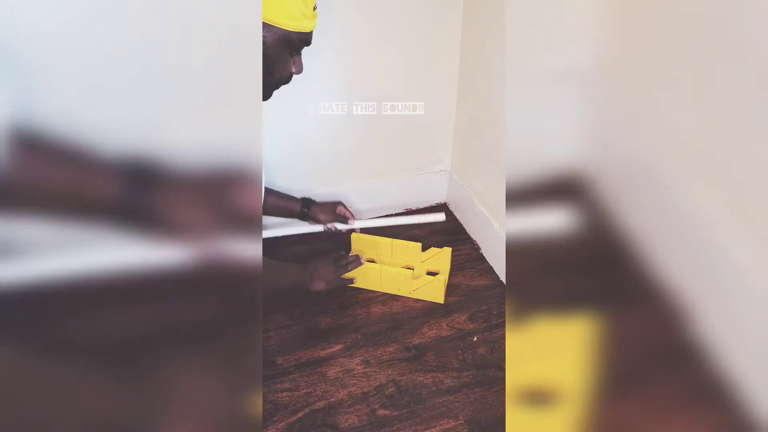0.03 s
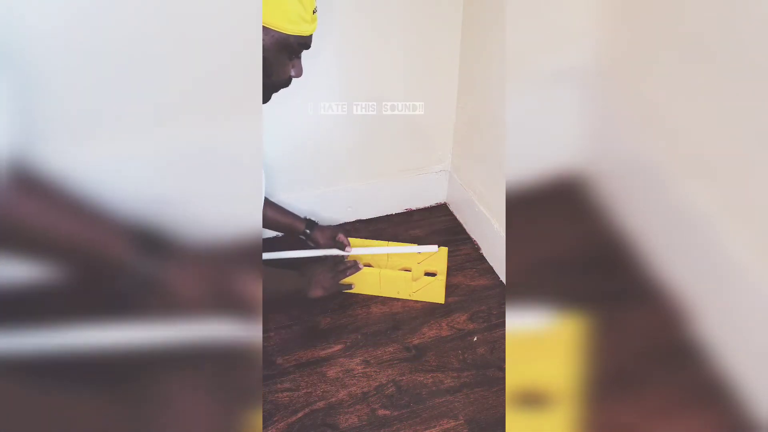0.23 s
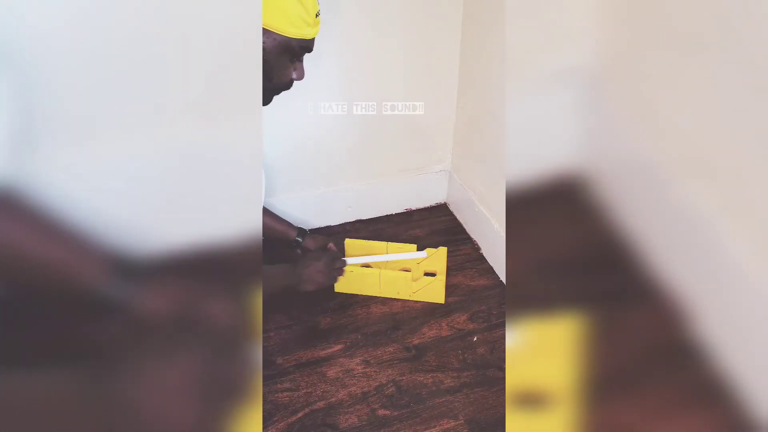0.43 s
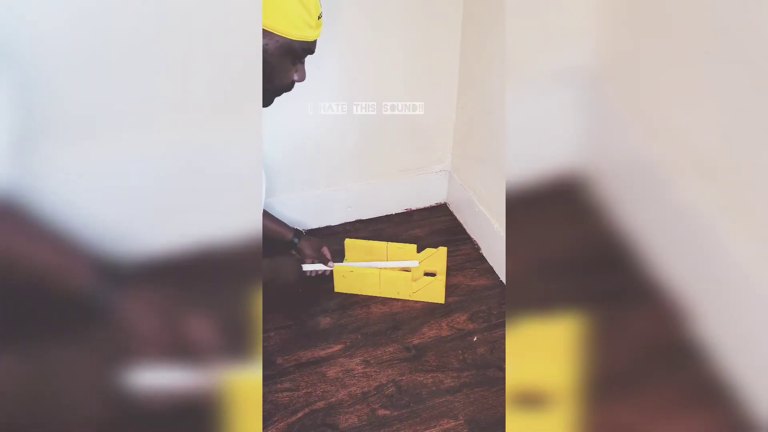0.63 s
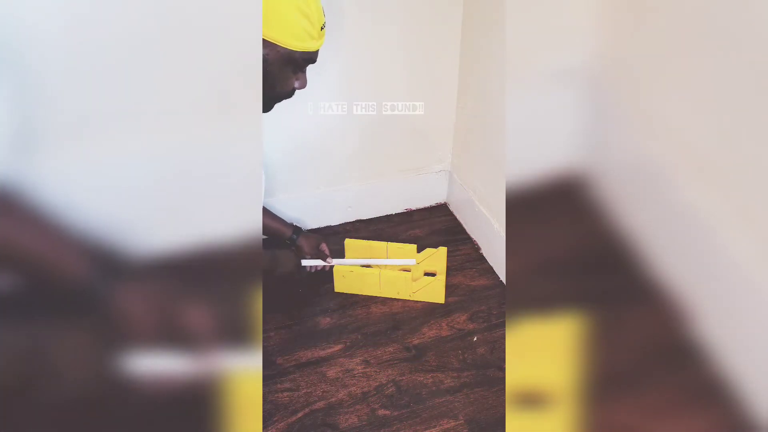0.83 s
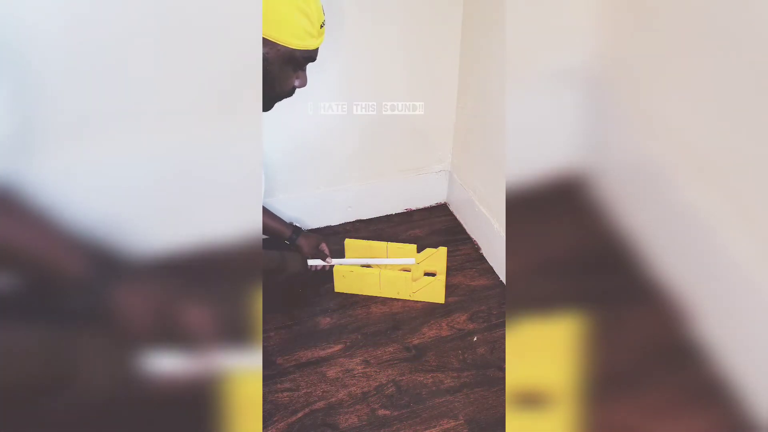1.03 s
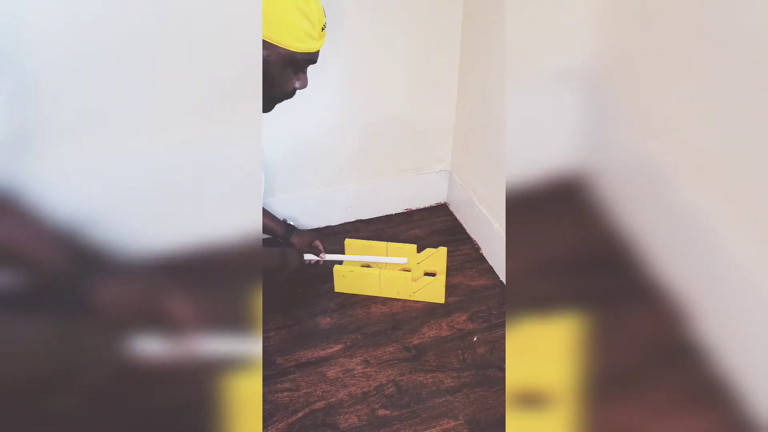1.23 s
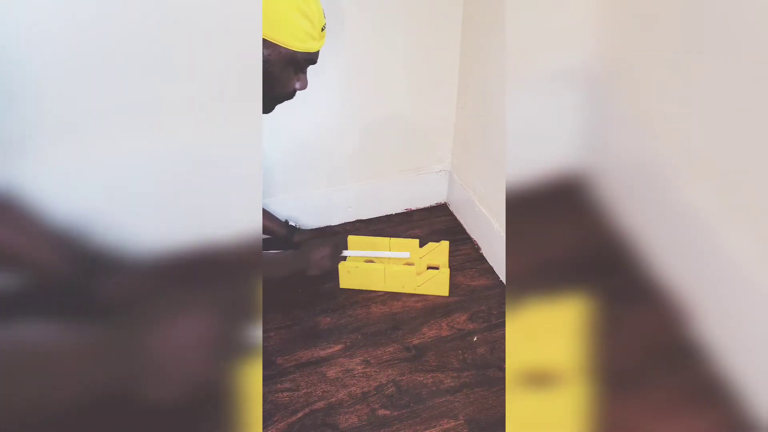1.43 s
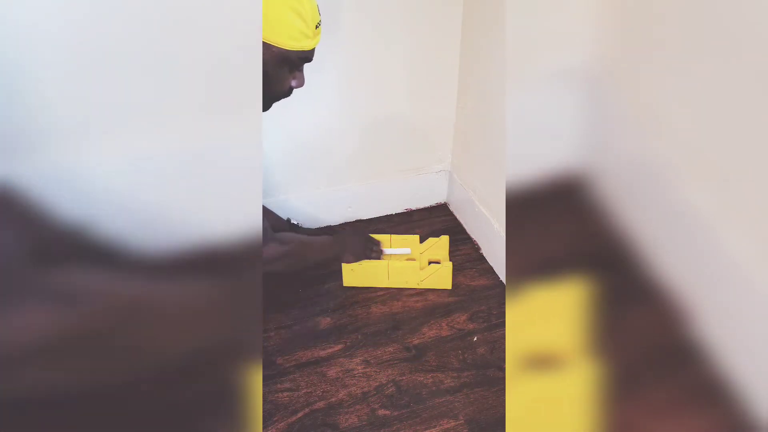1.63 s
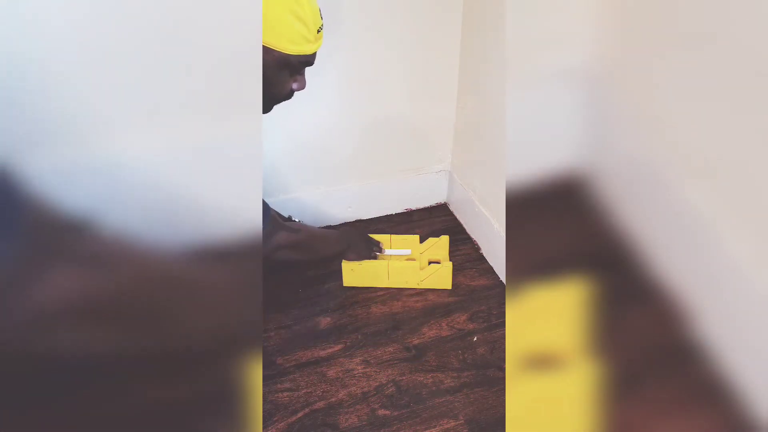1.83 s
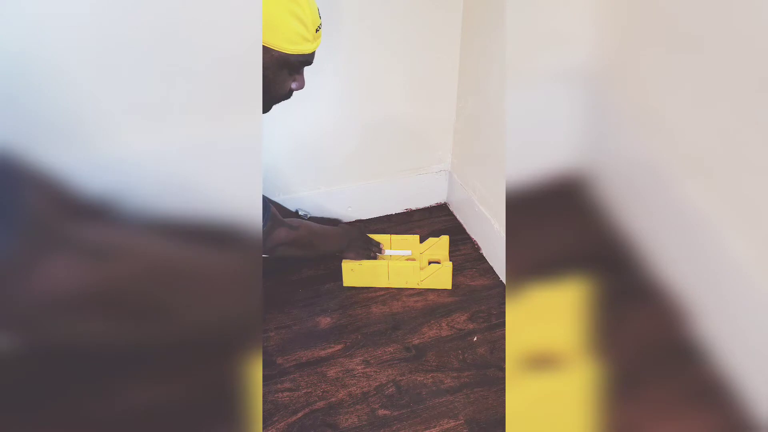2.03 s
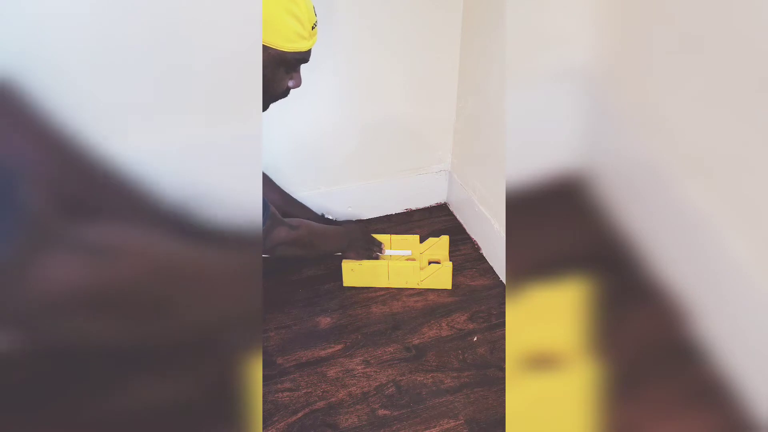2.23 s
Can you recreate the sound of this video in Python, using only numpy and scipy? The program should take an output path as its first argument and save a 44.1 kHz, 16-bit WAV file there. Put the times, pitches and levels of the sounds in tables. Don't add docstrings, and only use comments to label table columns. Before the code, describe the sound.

A strip of trim slides into a plastic miter box with a hissing rub and sharp high squeal, then bright hollow knocks, another scrape and faint touches; bare echoing room, close stereo microphone, low motor hum.

```python
import sys
import numpy as np
from scipy import signal
from scipy.fft import rfft, irfft
from scipy.io import wavfile
from scipy.ndimage import uniform_filter1d

SR = 44100
rng = np.random.default_rng(int(sys.argv[2]) if len(sys.argv) > 2 else 0)


def ratio_of_db(decibels):
    return 10 ** (np.asarray(decibels, float) / 20)


def digitize_waveform(pressure):
    field = np.atleast_2d(pressure).T
    bounded = np.clip(field, -1, 1)
    quanta = np.round(bounded * 32767).astype(np.int16)
    wavfile.write(sys.argv[1], SR, quanta)


N = 100812

# start in seconds, length in seconds, rubbing hiss in dB,
# strip singing in dB, box ringing in dB.
STROKES = [(-.1, 0.12, -39.5, -79, -53.5), (0.01, 0.18, -40, -25.5, -44.5), (0.126, 0.22, -33.5, -34, -46),
           (0.355, 0.19, -54, -51.5, -50.5), (0.527, .13, -44.5, -56, -42), (0.624, 0.02, -66, -58, -48),
           (0.776, 0.053, -70, -52, -38), (1.069, 0.17, -51, -53, -52), (1.193, 0.055, -69, -60, -42.5),
           (1.283, 0.26, -36.5, -40, -46), (1.449, 0.072, -48, -37.5, -34), (1.57, 0.024, -46, -48, -56),
           (1.67, 0.042, -64, -52, -61), (1.91, 0.031, -70, -66, -51), (2.131, .11, -50, -52, -61.5),
           (2.22, 0.091, -54.5, -78, -75)]
# pitch in Hz, width in Hz, level in dB.
FREE_STRIP_MODES = [(2254, 17, -14.5), (2480, 45, -4.5), (2761, 32, -3.5), (2845, 10.8, 2.5),
                    (3158, 52, 0.5), (3370, 42, -6), (3668, 30, -1.5), (4365, 44, -22)]
# pitch in Hz, width in Hz, level in dB.
HELD_STRIP_MODES = [(2170, 69, -13), (2446, 112, 3.5), (2850, 150, -1.5), (3130, 100, 1.5),
                    (3540, 134, -4.5), (4030, 86, -1.5)]
# pitch in Hz, width in Hz, level in dB.
BOX_MODES = [(732, 97, -3.5), (868, 35, 1), (933.4, 28, 5), (1119, 29, 1.5), (1261, 25.6, 2),
             (1413, 28, -6.5), (1510, 120, -8.5)]
# frequency in Hz, level in dB.
HISS_COLOUR = [(100, -12), (300, -14), (850, -6), (1800, -11.5), (6500, -14.5), (7800, -23), (14000, -20.5),
               (15800, -30)]
# time in seconds, pitch in Hz, level in dB.
SQUEAL_GLIDE = [
    (0.05, 3088, -18.5),
    (0.064, 3194, -21),
    (0.084, 3144, -10.5),
    (0.098, 3065, -32.5),
    (0.11, 3138, -19),
    (0.174, 3170, -52),
    (0.194, 3250, -16.5),
    (0.2, 3230, -59),
]
# time in seconds, pitch in Hz, level in dB.
WHINE_GLIDE = [
    (0.1, 3670, -52),
    (0.166, 3616, -45),
    (0.186, 3678, -17),
    (0.196, 3688, -42),
    (0.256, 3688, -33),
    (0.3, 3670, -48),
    (0.31, 3610, -31),
    (0.35, 3574, -57),
]
# time in seconds, pitch in Hz, level in dB.
SCRAPE_GLIDE = [
    (1.31, 2498, -35),
    (1.332, 2429, -45),
    (1.456, 2508, -48),
    (1.466, 2450, -53),
    (1.488, 2397, -40),
    (1.512, 2525, -35),
    (1.53, 2437, -44),
]
# time in seconds, peak in dB, brightness in dB per octave.
BLOWS = [
    (0.5933, -23, 0),
    (0.617, -33.5, -10.5),
    (0.7919, -27, 2.5),
    (1.2072, -30.5, -2),
]
# pitch in Hz, width in Hz, level in dB.
KNOCK_MODES = [(412, 214, -13), (846, 180, -8), (1002, 78, 0), (1082, 52, 2.5), (1288, 11.7, 5),
               (1460, 210, -6.5), (2240, 570, -12), (2514, 69, 0.5), (2820, 620, -11.5), (3680, 200, -9),
               (4170, 800, -18)]
# time in seconds, pitch in Hz, level in dB.
FLEX_GLIDE = [
    (0.53, 129.9, -50),
    (0.586, 118, -40),
    (0.676, 111.1, -33.5),
    (0.718, 101.3, -44),
    (0.748, 100, -37),
    (0.766, 100, -62),
    (0.778, 95.5, -36),
    (0.8, 95.6, -40),
]
# frequency in Hz, time to fall 60 dB in seconds.
ROOM_DECAY = [(100, 0.76), (500, 0.96), (1500, 0.86), (4000, 0.95), (9000, 0.88), (15000, 0.53)]
# frequency in Hz, left-right likeness from 0 to 1.
LIKENESS = [(60, 1.0), (240, 0.98), (950, 0.34), (3770, 0.14), (15000, -0.03)]
# multiple of the hum pitch, level in dB.
HUM_HARMONICS = [(1, -41.5), (2, -63.5), (3, -63), (4, -65.5), (5, -65.5), (6, -67), (7, -62)]
# frequency in Hz, level in dB.
AIR_COLOUR = [(35, -18), (80, -15), (200, -27.5), (950, -30.5), (3500, -43.5), (6800, -54.5), (7800, -76),
              (15500, -61)]

RISE_S, RISE_SHARE, RELEASE_S = 0.01, 0.37, 0.028
HISS_FLICKER_DB, FLICKER_DB = -1, 1
GRIT_DB, GRIT_PER_S = 2.0, 2100
HELD_FROM_S, BOX_BOTTOM_HZ = 0.5, 650
BLOW, RATTLE, RATTLE_S, KNOCK_TOP_HZ = 0.55, 0.069, 0.011, 4600
HUM_HZ, HUM_WAVER_DB, HUM_DRIFT_HZ = 58.43, 1.8, 0.14
AIR_DB = -50
RUB_DIRECT_DB, ROOM_DB = -1.5, -2.34
SQUEAL_LEFT_DB, SQUEAL_RIGHT_DB, SQUEAL_ROOM_DB = 4.0, -18, -12
WHINE_DIRECT_DB, WHINE_ROOM_DB = -1, -6
KNOCK_DIRECT_DB, KNOCK_ROOM_DB = 2.5, 7
FADE_S = 0.0013


def evened(x):
    return x / np.sqrt(np.mean(x ** 2) + 1e-20)


def read(points, hz):
    f, value = np.transpose(points)
    return np.interp(np.log(hz + 1), np.log(f + 1), value)


def colour(x, points):
    gain = ratio_of_db(read(points, np.fft.rfftfreq(N, 1 / SR)))
    return irfft(rfft(x) * gain, N)


def ring(x, modes):
    out = np.zeros(N)
    for k, (hz, width, db) in enumerate(modes):
        r = np.exp(-np.pi * width / SR)
        pole = r * np.exp(2j * np.pi * hz / SR)
        out += (-1) ** k * ratio_of_db(db) * 2 * signal.lfilter([1 - r], [1, -pole], x).real
    return out


def drift(smooth_s):
    n = round(smooth_s * SR)
    once = uniform_filter1d(rng.standard_normal(N), n)
    return evened(uniform_filter1d(once, n))


def alike(pair):
    n = pair.shape[1]
    left, right = rfft(pair)
    same = np.clip(read(LIKENESS, np.fft.rfftfreq(n, 1 / SR)) * 1.31 - 0.32, 0, 1)
    return irfft([left, same * left + np.sqrt(1 - same ** 2) * right], n)


def tone(glide, overtone, overtone_db):
    s, hz, db = np.transpose(glide)
    t = np.arange(N) / SR
    phase = 2 * np.pi * np.cumsum(np.interp(t, s, hz)) / SR
    edge = np.clip(np.minimum(t - s[0], s[-1] - t) / 0.03, 0, 1)
    wave = np.sin(phase) + ratio_of_db(overtone_db) * np.sin(overtone * phase)
    return np.sqrt(2) * edge * ratio_of_db(np.interp(t, s, db)) * wave


def stroke_pressure():
    t = np.arange(N) / SR
    press = np.zeros((3, N))
    for start, length, *dbs in STROKES:
        rise = np.clip((t - start) / (RISE_S + RISE_SHARE * length), 0, 1)
        rise = np.sin(np.pi / 2 * rise) ** 2
        release = np.exp(-np.maximum(t - start - length, 0) / RELEASE_S)
        press += ratio_of_db(np.array(dbs))[:, None] * rise * release
    flicker_db = [HISS_FLICKER_DB * drift(0.012), FLICKER_DB * drift(0.016), FLICKER_DB * drift(0.036)]
    return press * ratio_of_db(np.array(flicker_db))


def rubbing():
    t = np.arange(N) / SR
    hiss_press, strip_press, box_press = stroke_pressure()
    grain_db = GRIT_DB * np.minimum(rng.exponential(1, N), 5)
    grains = ratio_of_db(grain_db) * (rng.random(N) < GRIT_PER_S / SR)
    box_highpass = signal.butter(2, BOX_BOTTOM_HZ, "high", fs=SR)
    ears = []
    for grit in alike(rng.standard_normal((2, N)) * (1 + grains)):
        hiss = evened(colour(grit, HISS_COLOUR))
        free = evened(ring(grit, FREE_STRIP_MODES))
        held = evened(ring(grit, HELD_STRIP_MODES))
        strip = np.where(t < HELD_FROM_S, free, held)
        box = evened(signal.lfilter(*box_highpass, ring(grit, BOX_MODES)))
        ears.append(hiss_press * hiss + strip_press * strip + box_press * box)
    return np.array(ears)


def strip_squeal():
    return tone(SQUEAL_GLIDE, 2, -23.5)


def strip_whine():
    return tone(WHINE_GLIDE, 2, -45.5) + tone(SCRAPE_GLIDE, 2.6, -33.5)


def knocks():
    out, t = np.zeros(N), np.arange(N) / SR
    noise = rng.standard_normal(N)
    for start, peak_db, bright_db in BLOWS:
        crack = RATTLE * noise * (t >= start) * np.exp(-np.maximum(t - start, 0) / RATTLE_S)
        crack[round(start * SR)] += BLOW
        modes = [(hz, width, db + bright_db * np.log2(hz / 1000)) for hz, width, db in KNOCK_MODES]
        hit = ring(crack, modes)
        out += ratio_of_db(peak_db) * hit / abs(hit).max()
    return signal.lfilter(*signal.butter(2, KNOCK_TOP_HZ, fs=SR), out)


def strip_flex():
    return tone(FLEX_GLIDE, 3, -23)


def room(x):
    first_echo = np.arange(SR) > 250
    taps = rng.standard_normal((2, SR)) * (rng.random((2, SR)) < 0.06) * first_echo
    hz, t, z = signal.stft(alike(taps), SR, nperseg=256)
    decay = ratio_of_db(-60 * t / read(ROOM_DECAY, hz)[:, None])
    tail = signal.istft(z * decay, SR, nperseg=256)[1]
    return signal.fftconvolve(x[None], tail / np.linalg.norm(tail[0]), axes=1)[:, :N]


def motor_hum():
    phase = 2 * np.pi * np.cumsum(HUM_HZ + HUM_DRIFT_HZ * drift(0.35)) / SR
    hum = np.zeros(N)
    for multiple, db in HUM_HARMONICS:
        level = ratio_of_db(db + HUM_WAVER_DB * drift(0.1))
        hum += np.sqrt(2) * level * np.sin(multiple * phase)
    return hum * ratio_of_db(np.array([[-0.3], [0.3]]))


def room_air():
    air = [colour(noise, AIR_COLOUR) for noise in rng.standard_normal((2, N))]
    return ratio_of_db(AIR_DB) * evened(alike(np.array(air)))


def scene():
    rub, squeal, whine, hits = rubbing(), strip_squeal(), strip_whine(), knocks()
    near = ratio_of_db(RUB_DIRECT_DB) * rub
    near = near + squeal * ratio_of_db(np.array([[SQUEAL_LEFT_DB], [SQUEAL_RIGHT_DB]]))
    near = near + ratio_of_db(WHINE_DIRECT_DB) * whine + ratio_of_db(KNOCK_DIRECT_DB) * hits
    sent = rub[0] + ratio_of_db(SQUEAL_ROOM_DB) * squeal
    sent = sent + ratio_of_db(WHINE_ROOM_DB) * whine + ratio_of_db(KNOCK_ROOM_DB) * hits
    return near + ratio_of_db(ROOM_DB) * room(sent) + strip_flex() + motor_hum() + room_air()


def band_limit(x):
    return signal.sosfilt(signal.butter(12, 15980, fs=SR, output="sos"), x)


def record(dry):
    fade = np.clip(np.arange(N)[::-1] / (FADE_S * SR), 0, 1)
    return band_limit(dry * fade)


dry = scene()
out = record(dry)
digitize_waveform(out)
```